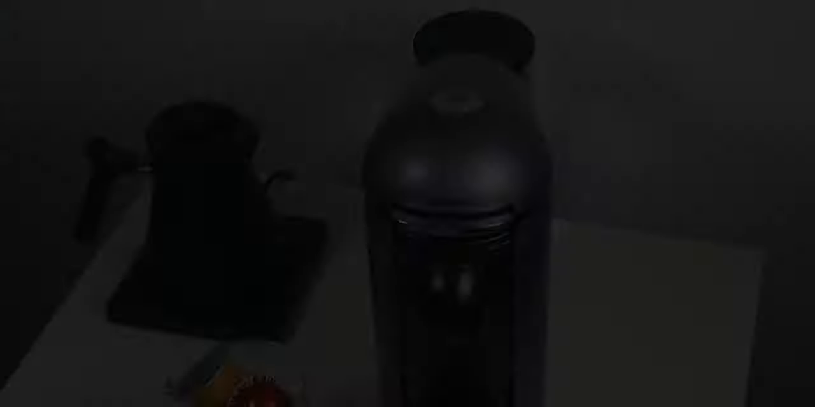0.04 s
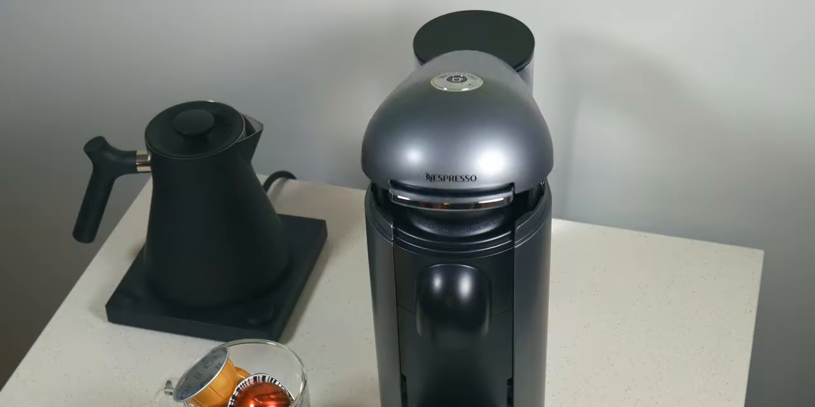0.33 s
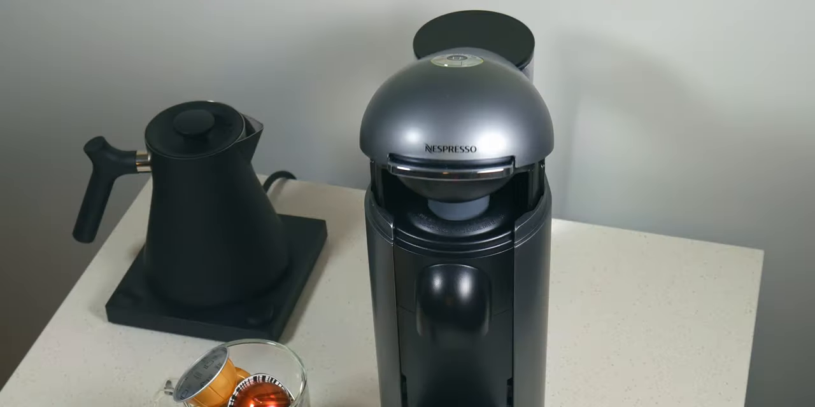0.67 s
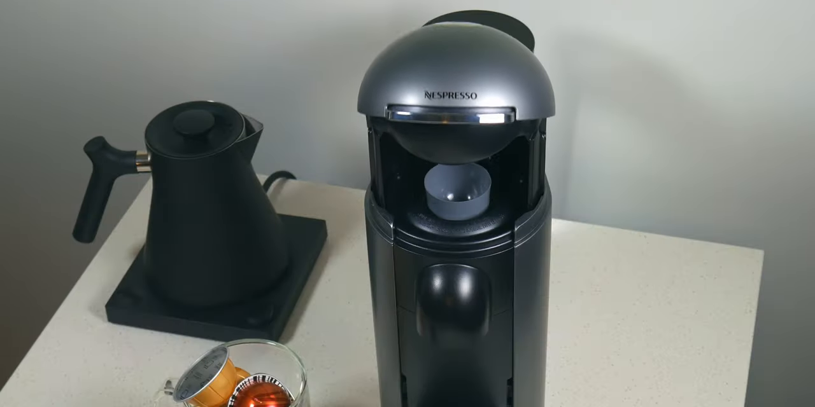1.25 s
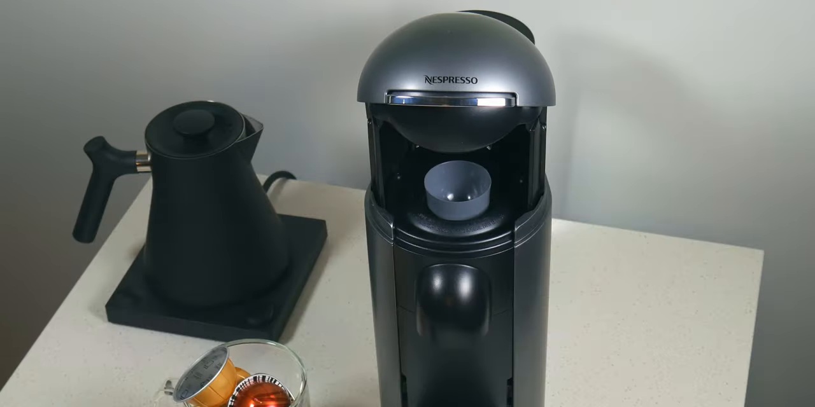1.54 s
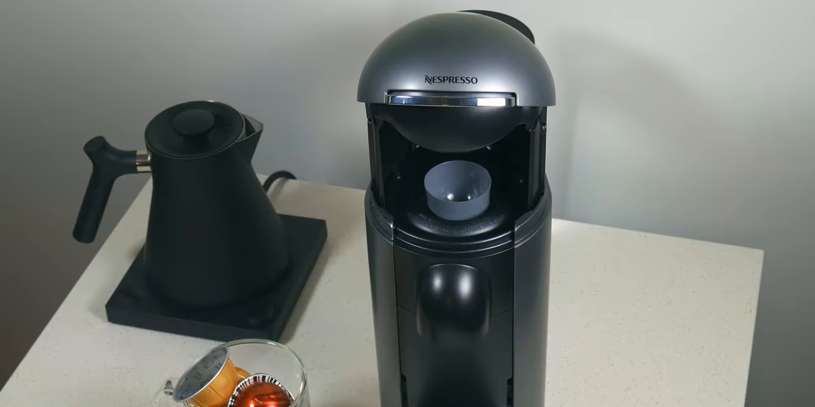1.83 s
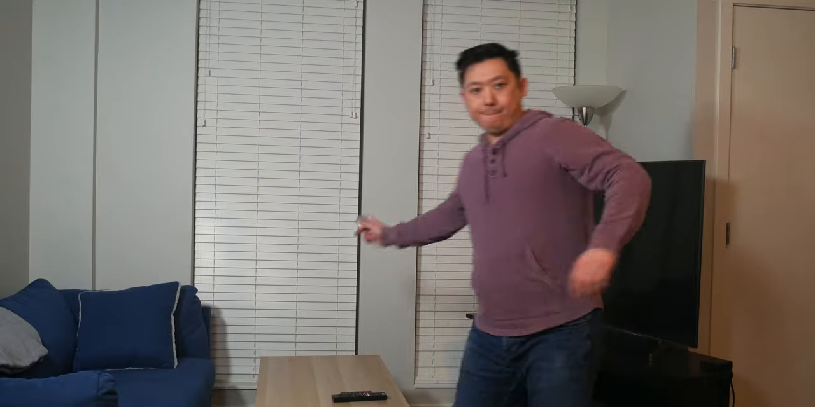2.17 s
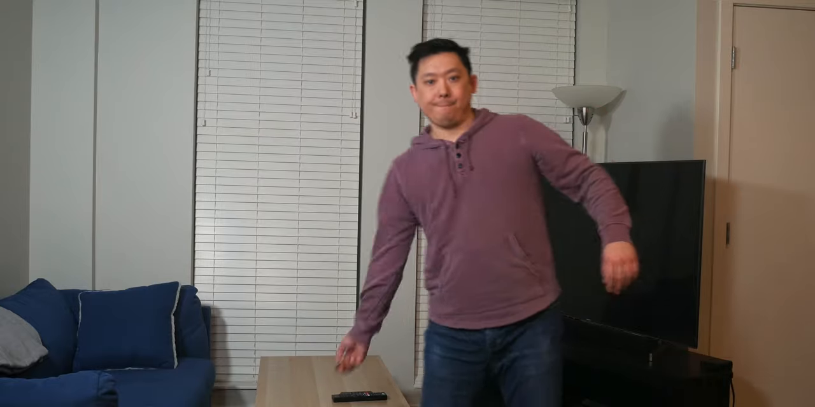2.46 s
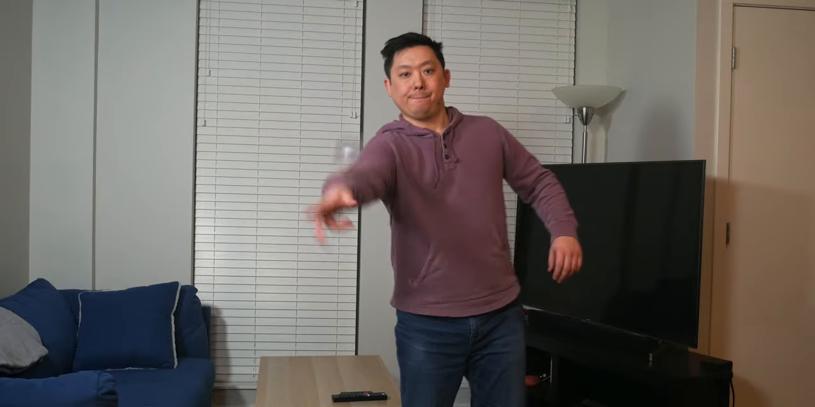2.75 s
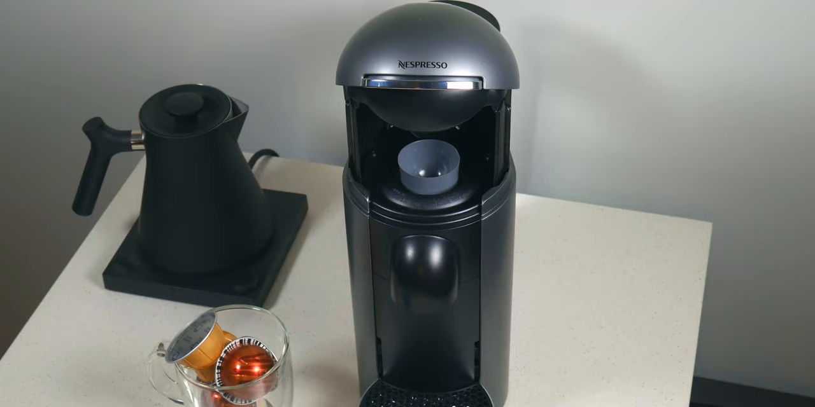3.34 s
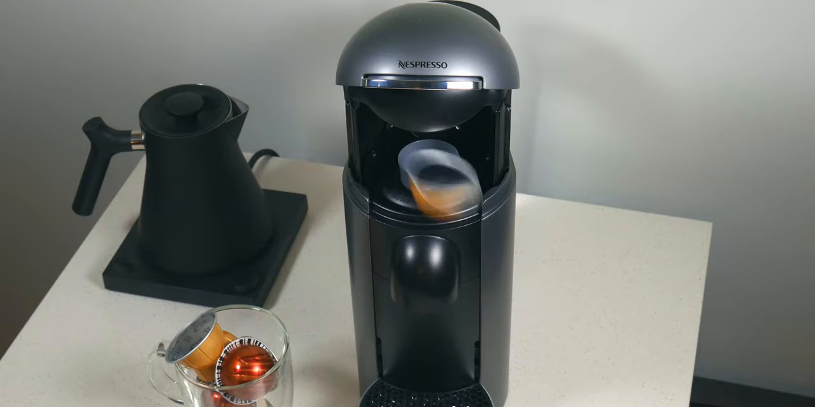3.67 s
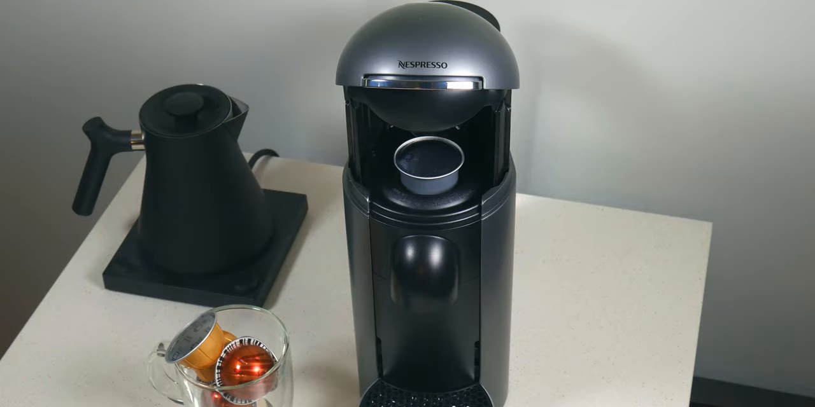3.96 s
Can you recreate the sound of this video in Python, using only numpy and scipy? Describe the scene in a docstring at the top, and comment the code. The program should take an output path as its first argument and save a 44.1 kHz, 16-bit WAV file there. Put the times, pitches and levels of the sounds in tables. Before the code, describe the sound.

A capsule coffee machine's geared motor whirs and creaks as its head lifts, then clunks and stops. Soft taps, a foot shuffle and faint clothes rustle follow in a quiet room, before an aluminium capsule clatters into the plastic holder.

```python
"""A geared motor whirs, lifting the head of a capsule coffee machine; the hinge sticks and slips,
the head clunks free and stops. Two soft taps, a shuffle and rustling clothes follow in a quiet room,
then a faint bright snap. An aluminium capsule drops onto the plastic holder, rattles round its rim
and seats itself, each bounce ringing the machine, the holder and the capsule's foil shell."""
import sys
import numpy as np
from scipy import signal
from scipy.fft import rfft, irfft, next_fast_len
from scipy.io import wavfile
from scipy.ndimage import uniform_filter1d, map_coordinates

SR = 44100
rng = np.random.default_rng(int(sys.argv[2]) if len(sys.argv) > 2 else 0)


def generate_wav(sig):
    """Save sig (samples, or channels by samples) to the path in sys.argv[1] as 16-bit PCM at SR."""
    pcm = np.round(np.clip(np.atleast_2d(sig).T, -1, 1) * 32767).astype(np.int16)
    wavfile.write(sys.argv[1], SR, pcm)


N = 176400
TIME_S = np.arange(N) / SR


def amp(db):
    """Decibels to gain."""
    return 10 ** (np.asarray(db) / 20)


def unit(x):
    """Scale to rms 1."""
    return x / np.sqrt(np.mean(x ** 2) + 1e-20)


def along(points, hz):
    """Interpolate (frequency [Hz], value) points on a log axis."""
    knots_hz, values = np.transpose(points)
    return np.interp(np.log(hz + 1), np.log(knots_hz + 1), values)


def curve(rows):
    """Join (time [s], value) points by lines."""
    return np.interp(TIME_S, *np.transpose(rows))


def wobble(rate_hz):
    """Smooth random curve, rate_hz knots a second."""
    return map_coordinates(rng.standard_normal(1024), [TIME_S * rate_hz], mode="mirror")


def fade(t, t60_s):
    """Exponential decay."""
    return np.exp(-np.log(1000) * t / t60_s)


def swells(rows):
    """Gaussian envelopes from (centre [s], half width [s], level [dB]) rows."""
    return sum(amp(db) * np.exp(-((TIME_S - s) / half_s) ** 2) for s, half_s, db in rows)


def add(track, start_s, sound):
    """Mix a sound in at start_s."""
    i = round(start_s * SR)
    track[i:i + len(sound)] += sound[:N - i]


def filtered(x, response):
    """Apply a frequency response."""
    size = x.shape[-1]
    padded = next_fast_len(size + 8192)
    return irfft(rfft(x, padded) * response(np.fft.rfftfreq(padded, 1 / SR)), padded)[..., :size]


def coloured(x, spectrum):
    """Shape x by a spectrum, at rms 1."""
    return unit(filtered(x, lambda hz: amp(along(spectrum, hz))))


def noise(spectrum, size=N):
    """Coloured noise, rms 1."""
    return coloured(rng.standard_normal(size), spectrum)


def wide(spectrum):
    """Coloured noise, independent left and right."""
    return np.array([noise(spectrum), noise(spectrum)])


def burst(spectrum, envelope):
    """Noise burst through a minimum-phase filter, so it rings only after the onset."""
    size = len(envelope)
    gain = unit(amp(along(spectrum, np.fft.rfftfreq(2 * size, 1 / SR))))
    cepstrum = irfft(np.log(gain))
    causal = np.exp(rfft(np.r_[cepstrum[0], 2 * cepstrum[1:size]], 2 * size))
    return irfft(rfft(envelope * rng.standard_normal(size), 2 * size) * causal)[:size]


def ring(modes, t, scatter_db, detune=0, low_cut_hz=212):
    """Damped modes, scattered at every blow; small parts radiate little bass."""
    hz, db, t60_s = np.transpose(modes)[:, :, None]
    level, shift = rng.standard_normal((2,) + hz.shape)
    sines = np.sin(2 * np.pi * hz * (1 + detune * shift) * t)
    sound = np.sum(amp(db + scatter_db * level) * sines * fade(t, t60_s), 0)
    return signal.sosfilt(signal.butter(6, low_cut_hz, "high", fs=SR, output="sos"), sound)


# room decay (frequency [Hz], t60 [s])
ROOM_DECAY = [(100, 0.22), (600, 0.58), (3000, 0.54), (12000, 0.31)]

def room(x):
    """Short echo whose treble dies early."""
    hz, t, bands = signal.stft(rng.standard_normal(SR // 2), SR, nperseg=256)
    tail = signal.istft(bands * fade(t, along(ROOM_DECAY, hz)[:, None]), SR, nperseg=256)[1]
    return signal.fftconvolve(x, np.pad(tail, (SR // 200, 0)) / np.linalg.norm(tail))[:N]


# centred and wide room tone (frequency [Hz], gain [dB])
AIR_SPECTRUM = [(25, -18), (60, 2), (122, -6.5), (210, -5), (400, -6.5), (720, -3.5), (1150, -15),
                (1290, 0), (1450, -18), (2000, -23), (8000, -28), (15500, -39)]
WIDE_AIR_SPECTRUM = [(25, -24), (70, -0.5), (250, 0.5), (600, -2), (1500, -5.5), (4000, -18.5),
                     (15500, -27)]

def air(wide_from_s=1.95, wide_to_s=3.2, centre_dip_db=-20, hiss_db=-73):
    """Room tone over faint hiss; it enters with the motor and widens for a while."""
    spread = uniform_filter1d(1. * ((TIME_S > wide_from_s) & (TIME_S < wide_to_s)), size=2000)
    centre = amp(-64.5 + centre_dip_db * spread) * noise(AIR_SPECTRUM)
    around = amp(-64) * spread * wide(WIDE_AIR_SPECTRUM)
    hiss = amp(hiss_db) * rng.standard_normal((2, N))
    return (centre + around + hiss) * (TIME_S > MOTOR_ON_S)


# rustle before its taper (time [s], level [dB])
RUSTLE_LEVEL = [(1.65, -80), (1.8, -65), (1.95, -65), (2.11, -60.5), (2.33, -59.5), (2.48, -63.5),
                (2.85, -61.5), (3.03, -70.5), (3.2, -63.5)]
# arm and sleeve strokes (centre [s], half width [s], level [dB])
ARM_SWISHES = [(2.38, 0.04, -65), (2.89, 0.089, -59)]
SLEEVE_BRUSHES = [(1.82, 0.02, -66), (2.31, 0.053, -68.5), (2.81, 0.049, -62.5)]
# cloth, arm and sleeve noise (frequency [Hz], gain [dB])
CLOTH_SPECTRUM = [(150, -12), (400, -8), (1100, -8.5), (2000, -9), (5000, -11.5), (7700, -14.5),
                  (10500, -17), (13000, -25), (15500, -29.5)]
ARM_SPECTRUM = [(100, -22), (400, -5), (1100, 4.5), (2200, -4), (4000, -14), (12000, -38)]
SLEEVE_SPECTRUM = [(1000, -14), (4000, -7), (7000, 8), (10500, 6), (13000, -3.5), (15500, -11)]

def clothes():
    """Cloth rustles, an arm swishes and a sleeve brushes past."""
    taper = curve([(1.5, 1), (1.75, 0.82), (3.1, 0.52), (3.25, 0)])
    envelope = taper * amp(curve(RUSTLE_LEVEL) + 1 + 0.51 * wobble(25.5))
    rustle = envelope * unit(wide(CLOTH_SPECTRUM) + 2.3 * noise(CLOTH_SPECTRUM))
    arm = swells(ARM_SWISHES) * wide(ARM_SPECTRUM)
    sleeve = swells(SLEEVE_BRUSHES) * unit(wide(SLEEVE_SPECTRUM) + noise(SLEEVE_SPECTRUM))
    return rustle + arm + sleeve


# foot friction (frequency [Hz], gain [dB])
SHUFFLE_SPECTRUM = [(60, -31), (200, -4), (450, 7.5), (1000, 6.5), (1400, -10), (2000, -2), (3500, -24),
                    (12000, -30)]

def shuffle(start_s=2.105, rise_s=0.0084, t60_s=0.35):
    """A foot shuffles, spread wide by the room."""
    t = np.maximum(TIME_S - start_s, 0)
    return amp(-43.5) * fade(t, t60_s) * (1 - np.exp(-t / rise_s)) * wide(SHUFFLE_SPECTRUM)


# soft taps (time [s], level [dB])
TAP_HITS = [(1.8299, -43), (1.8916, -43)]
# tap noise (frequency [Hz], gain [dB])
TAP_SPECTRUM = [(30, -11), (100, 6), (400, -3), (850, 4), (1300, -7.5), (2000, -19), (5000, -44)]

def taps(t60_s=0.046):
    """Two dull taps."""
    out, t = np.zeros(N), np.arange(SR // 2) / SR
    for s, db in TAP_HITS:
        add(out, s, amp(db) * burst(TAP_SPECTRUM, fade(t, t60_s)))
    return out


# snap noise (frequency [Hz], gain [dB])
SNAP_SPECTRUM = [(1000, -15), (3200, -22), (4000, -4), (4270, 1.5), (4500, -1), (5100, -8), (5800, 2),
                 (6700, -8.5), (9000, -12), (10500, -22), (15500, -25)]

def snap(at_s=3.495, ring_hz=4245):
    """A brief slide swells into a light snap, leaving an echo and a thin metallic ring."""
    out, t = np.zeros(N), np.arange(SR // 2) / SR
    direct = amp(-40.5) * fade(t, t60_s=0.027)
    echo = amp(-48.5) * fade(t, t60_s=0.38)
    add(out, at_s, noise(SNAP_SPECTRUM, len(t)) * (direct + echo))
    add(out, at_s, amp(-58.5) * np.sin(2 * np.pi * ring_hz * t) * fade(t, t60_s=0.52))
    slide = amp(-49.5) * noise(SNAP_SPECTRUM, len(t)) * fade(t, t60_s=0.063)[::-1]
    add(out, at_s - len(t) / SR, slide)
    return out


# motor effort (time [s], level [dB])
MOTOR_LEVEL = [(.05, -36.5), (.2, -37.5), (.4, -37.5), (.62, -36.5), (.66, -35), (.71, -38), (.93, -37),
               (1.05, -38), (1.22, -36), (1.38, -41), (1.52, -43)]
MOTOR_ON_S, MOTOR_OFF_S = 0.0455, 1.519

def motor_envelope():
    """The motor starts at once and stops quickly; the gearbox rings out faintly."""
    off_s = np.maximum(TIME_S - MOTOR_OFF_S, 0)
    run_down = np.maximum(fade(off_s, t60_s=0.033), amp(-10) * fade(off_s, t60_s=0.46))
    return (TIME_S > MOTOR_ON_S) * amp(curve(MOTOR_LEVEL)) * run_down


# lesser gear swells (rate [1/turn], depth [dB])
GEAR_SWINGS = [(3, 1.5), (6, 1.5)]

def gear_swell(turns, tight_db=2):
    """Gain that rises at the gears' tight spot once a turn, with lesser swells between."""
    lesser_db = sum(db * np.cos(2 * np.pi * (k * turns + rng.random())) for k, db in GEAR_SWINGS)
    return amp(tight_db * np.cos(2 * np.pi * turns) + lesser_db)


# shaft speed (time [s], speed [turns/s])
SHAFT_SPEED = [(.05, 38.3), (.12, 39.2), (.19, 40.35), (.27, 40.27), (.35, 39.97), (.43, 39.92),
               (.55, 40.3), (.63, 40.05), (.71, 39.45), (.79, 39.95), (.91, 39.75), (1.0, 39.23),
               (1.18, 38.85), (1.52, 37.8)]
# gear tones (order [1/turn], relative level [dB])
GEAR_TONES = [(6, -21), (11, -15.5), (12, -9.5), (13, -10.5), (14, -4), (16, -12), (19, -21), (23, -13),
              (24, -11.5), (26, -14.5), (28, -17), (35, -54), (37, -15), (38, -17), (39, -30), (43, -46),
              (46, -13)]
# gearbox loaded and running free (frequency [Hz], gain [dB])
LOADED_SPECTRUM = [(30, -24), (170, -26.5), (225, -6), (310, -8.5), (360, -9), (440, -3), (570, -3.5),
                   (700, -13), (950, -7.5), (1250, -11), (1500, -7), (2000, -13), (3100, -15), (3480, -20),
                   (3760, -11.5), (4020, -11), (4250, -23), (5000, -26), (8200, -25.5), (9800, -33.5),
                   (11000, -43.5), (15500, -49)]
FREE_SPECTRUM = [(24, -26), (40, -9), (91, -12), (146, -21), (224, -1), (342, -0.5), (859, -0.5), (1190, 0),
                 (1450, -9), (1860, -2.5), (2450, -9.5), (4200, -12.5), (4900, -15.5), (5600, -19.5),
                 (8960, -22), (15500, -54)]
TIGHT_SPOT_S, UNLOAD_AT_S, UNLOAD_TAKES_S = 0.06, 1.295, 0.041
MESH_CORNER_HZ, WHINE_HZ = 2500, 3816

def motor():
    """Gear tones, tooth mesh, rasp and a wavering whine; the load drops once the head is free."""
    turns = np.cumsum(curve(SHAFT_SPEED) * (1 + 0.0017 * wobble(31.5))) / SR
    turns -= np.interp(TIGHT_SPOT_S, TIME_S, turns)
    # the same tooth pattern every turn
    teeth = map_coordinates(rng.standard_normal(1100), [turns % 1 * 1100], mode="grid-wrap")
    mesh = filtered(teeth, lambda hz: 1 / np.hypot(1, hz / MESH_CORNER_HZ))
    swell = gear_swell(turns)
    rasp = unit(swell * amp(1.7 * wobble(120)) * rng.standard_normal(N))
    drive = amp(-2.5) * mesh + rasp
    tones = sum(amp(db + 3.9 * wobble(5.27)) * np.sin(2 * np.pi * (order * turns + rng.random()))
                for order, db in GEAR_TONES)
    whine_gain = swell * amp(3 * wobble(150))
    whine_cycles = np.cumsum(WHINE_HZ * (1 + 0.014 * wobble(70))) / SR
    whine = unit(whine_gain * np.sin(2 * np.pi * whine_cycles))
    loaded = amp(-1.8) * coloured(drive, LOADED_SPECTRUM) + amp(0.5) * tones + amp(-17) * whine
    free = coloured(drive, FREE_SPECTRUM) + amp(-25) * tones
    freed = np.clip((TIME_S - UNLOAD_AT_S) / UNLOAD_TAKES_S + 0.5, 0, 1)
    return ((1 - freed) * loaded + freed * free) * motor_envelope()


# hinge slips (time [s], level [dB], pitch [Hz])
HINGE_SLIPS = [(.046, -27, 461), (.101, -32.5, 464), (.148, -28, 510), (.474, -25.5, 547),
               (.497, -27.5, 487), (0.52, -29, 482), (.546, -30.5, 450), (.748, -26, 498),
               (.772, -24.5, 487), (.801, -29, 493), (.826, -27.5, 482), (0.872, -34, 493),
               (0.9, -24.5, 515), (.925, -30, 466), (.937, -28.5, 577), (0.954, -30, 526), (1.23, -24, 476),
               (1.274, -25, 504)]
# hinge modes (ratio to pitch, gain [dB], t60 [s])
HINGE_MODES = [(0.869, -10, 0.048), (0.999, 9, 0.037), (1.119, -8.5, 0.087), (1.24, -20, 0.03)]

def hinge(rise_s=0.003):
    """The hinge sticks and slips in runs; each slip is a short groan at its own pitch."""
    out, t = np.zeros(N), np.arange(SR // 8) / SR
    for s, db, hz in HINGE_SLIPS:
        groan = sum(amp(mode_db) * np.sin(2 * np.pi * hz * ratio * t) * fade(t, t60_s)
                    for ratio, mode_db, t60_s in HINGE_MODES)
        add(out, s, amp(db) * groan * (1 - np.exp(-t / rise_s)))
    return out


# machine body modes (frequency [Hz], gain [dB], t60 [s])
BASE_MODES = [(232, -7, 0.11), (303, 2.5, 0.05), (319, -10, 0.089)]
HOUSING_MODES = [(400, -17, 0.083), (454.3, 0.5, 0.094), (495, 5, 0.061), (574, -10, 0.11),
                 (611, -13, 0.14), (823, -13.5, 0.081), (1070, -18.5, 0.054), (1248, -14.5, 0.088),
                 (1466, -6.5, .04)]

def thump(t, base_db, housing_db, flex_s=0.003):
    """The deep base and the hollow housing answer a blow."""
    base = amp(base_db) * ring(BASE_MODES, t, scatter_db=-1.5)
    housing = amp(housing_db) * ring(HOUSING_MODES, t, scatter_db=5.3, detune=0.017)
    return (base + housing) * (1 - np.exp(-t / flex_s))


# head knocks (time [s], base [dB], housing [dB], click [dB], latch [dB], tick [dB])
HEAD_KNOCKS = [(1.2445, -29, -18.5, -24.5, -35, -40), (1.2481, -21, -20, -24.5, -57.5, -51.5),
               (1.2703, -42, -47, -49.5, -42, -40), (1.2954, -29, -28.5, -29.5, -27.5, -41.5),
               (1.3036, -23, -26.5, -45.5, -55.5, -45), (1.512, -55, -47, -33.5, -57, -68),
               (1.522, -48, -42, -35.5, -70, -67)]
# click, latch and bright contact noise, the last shared with the capsule (frequency [Hz], gain [dB])
CLICK_SPECTRUM = [(60, -13), (300, -0.5), (850, 13), (1500, 7.5), (2300, -6), (3400, -12.5), (4200, -17.5),
                  (8500, -22.5), (11000, -35), (15500, -36.5)]
LATCH_SPECTRUM = [(1500, -27), (2800, 0), (3500, 4), (4600, -5), (5500, -4.5), (7500, -14), (10000, -33),
                  (15500, -46)]
FIZZ_SPECTRUM = [(200, -2), (2500, 2), (5300, 3), (6500, 2.5), (8400, 5), (10500, -5), (14000, -2.5),
                 (16000, -19)]

def head_knocks():
    """The head breaks free, its latch snaps and it reaches its stop, thumping the machine."""
    out, t = np.zeros(N), np.arange(SR // 3) / SR
    for s, base_db, housing_db, click_db, latch_db, tick_db in HEAD_KNOCKS:
        latch = amp(latch_db) * burst(LATCH_SPECTRUM, fade(t, t60_s=0.012))
        tick = amp(tick_db) * burst(FIZZ_SPECTRUM, fade(t, t60_s=0.019))
        body = thump(t, base_db, housing_db)
        click = amp(click_db) * burst(CLICK_SPECTRUM, fade(t, t60_s=0.023))
        add(out, s, body + click + latch + tick)
    return out


# rim slides (centre [s], half width [s], level [dB])
RIM_SCRAPES = [(3.722, 0.014, -38), (3.796, 0.0088, -36.5), (3.85, 0.032, -40.5), (3.885, 0.0066, -33.5)]

def capsule_scrapes():
    """The capsule's rim slides over the plastic: grainy hiss between bounces."""
    return swells(RIM_SCRAPES) * unit(noise(FIZZ_SPECTRUM) * amp(3 * wobble(900)))


# bounces (time [s], base [dB], housing [dB], holder [dB], foil [dB], crack [dB], fizz [dB])
CAPSULE_BOUNCES = [(3.7021, -26.5, -25.5, -53, -33, -16, -22.5), (3.7095, -18.5, -29, -54, -47, -41, -39.5),
                   (3.7277, -38, -35.5, -61, -50, -53, -35), (3.7773, -42, -43, -30, -18.5, -26.5, -23.5),
                   (3.783, -37, -29, -34, -40, -28, -35), (3.8048, -31, -27.5, -45, -26, -22, -24.5),
                   (3.807, -28.5, -21, -34, -34, -31, -31.5), (3.8425, -48, -23, -40, -44.5, -32, -31),
                   (3.853, -45, -25, -44, -40.5, -34.5, -42.5),
                   (3.8871, -35, -40, -14, -49.5, -20.5, -28.5), (3.9239, -50, -30.5, -36, -61, -33, -53.5),
                   (3.957, -58, -46, -42, -65, -36.5, -56)]
# plastic holder and foil shell modes (frequency [Hz], gain [dB], t60 [s])
HOLDER_MODES = [(522, -17.5, 0.19), (614, -10.5, 0.25), (701, -13, 0.18), (746, -14, 0.27),
                (805, -2, 0.038), (829, -6.5, 0.12), (908, -15, 0.16), (1769, -16, 0.31), (1800, 2.5, 0.02),
                (2740, -5, 0.013), (3140, -1, 0.016), (3340, -.5, 0.017)]
FOIL_MODES = [(3620, -8.5, 0.024), (4350, -8, 0.028), (5310, -3.5, 0.023), (7300, -22, 0.021),
              (8100, 2.5, 0.02), (8600, -9, 0.059), (9120, -5, .025), (12560, -8, 0.023), (13960, -8, .02)]
# contact noise (frequency [Hz], gain [dB])
CRACK_SPECTRUM = [(40, -13), (200, -4.5), (600, 2), (1300, 2), (2200, -5.5), (2750, -3), (3700, -16.5),
                  (4500, -10.5), (8000, -14.5), (15500, -39)]

def capsule_bounces():
    """Each bounce cracks and rings machine, holder and shell; the shell's pitch shifts as it lands."""
    out, t = np.zeros(N), np.arange(SR // 3) / SR
    rattle = amp(-13) * fade(t, t60_s=0.26)
    for s, base_db, housing_db, holder_db, foil_db, crack_db, fizz_db in CAPSULE_BOUNCES:
        holder = amp(holder_db) * ring(HOLDER_MODES, t, scatter_db=1.8)
        foil = amp(foil_db) * ring(FOIL_MODES, t, scatter_db=2.2, detune=0.014)
        crack = amp(crack_db) * burst(CRACK_SPECTRUM, fade(t, t60_s=0.023) + rattle)
        fizz = amp(fizz_db) * burst(FIZZ_SPECTRUM, fade(t, t60_s=0.014) + rattle)
        add(out, s, thump(t, base_db, housing_db) + holder + foil + crack + fizz)
    return out


# stereo side filter (frequency [Hz], gain [dB])
SIDE_RESPONSE = [(30, -18), (100, -28), (300, -37.5), (700, -42.5), (2500, -26.5), (8000, -17.5),
                 (14000, -20)]

def scene(echo_db=-15):
    """Machine, taps and snap centred with a trace of width; shuffle, clothes and air around them."""
    machine = motor() + hinge() + head_knocks() + capsule_bounces() + capsule_scrapes()
    mid = machine + amp(echo_db) * room(machine) + taps() + snap()
    side = filtered(0.9 * mid + 0.27 * room(mid), lambda hz: 1j * amp(along(SIDE_RESPONSE, hz)))
    return np.array([mid + side, mid - side]) + shuffle() + clothes() + air()


TOP_HZ = 15900

def record(dry):
    """Brick-wall low-pass."""
    return filtered(dry, lambda hz: hz < TOP_HZ)


dry = scene()
out = record(dry)
generate_wav(out)
```